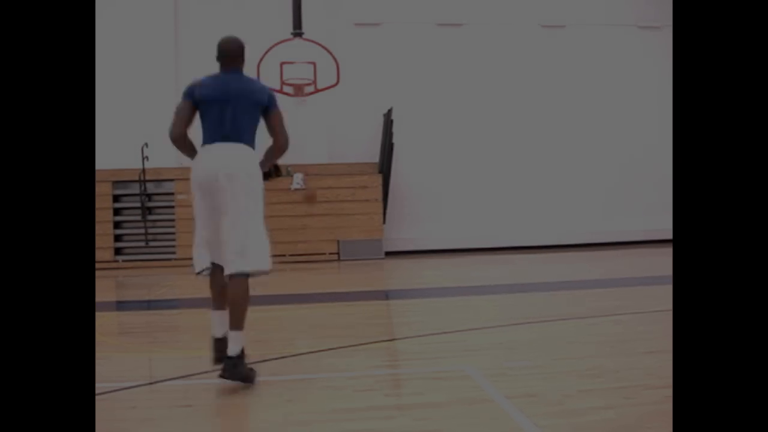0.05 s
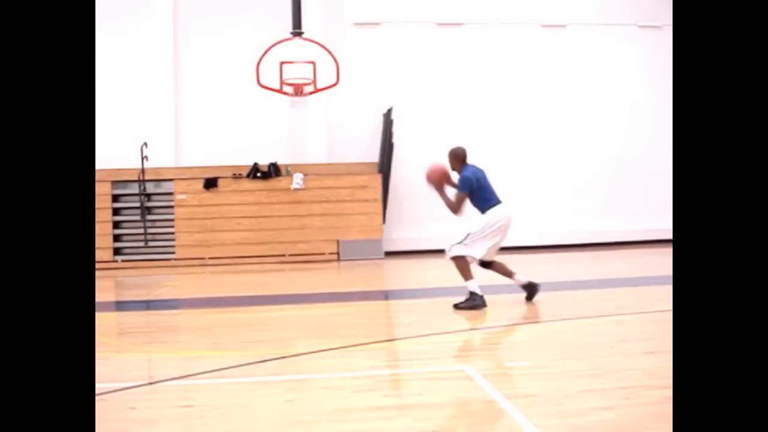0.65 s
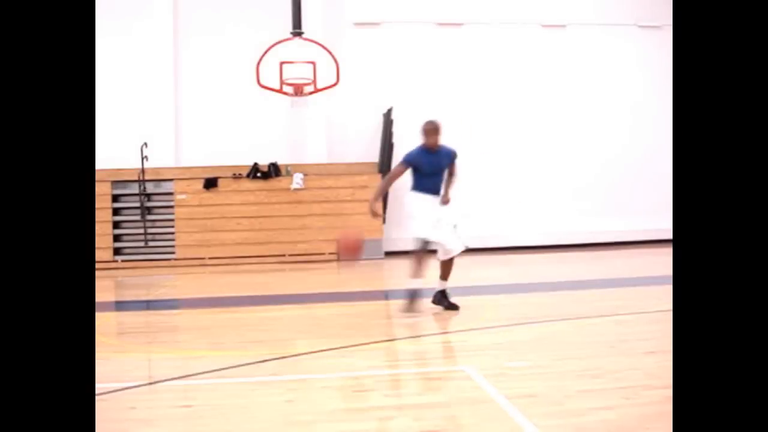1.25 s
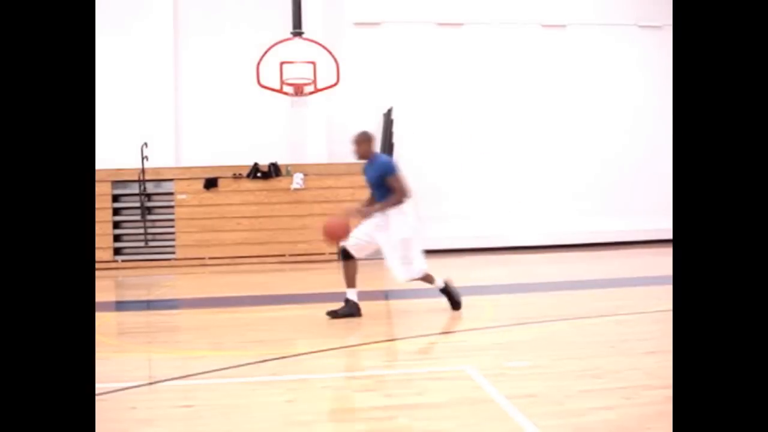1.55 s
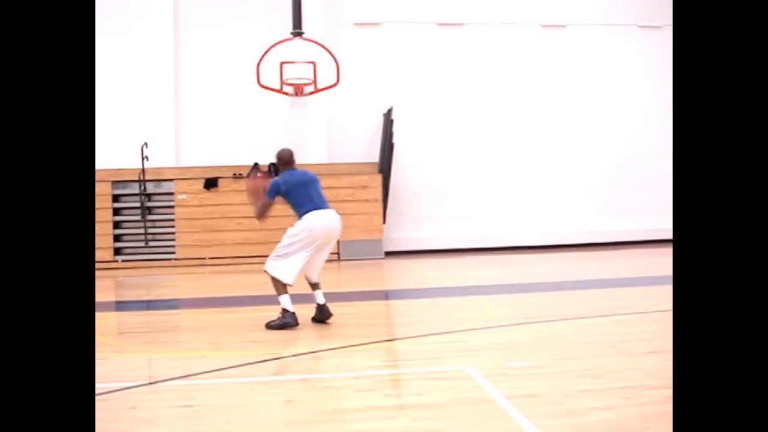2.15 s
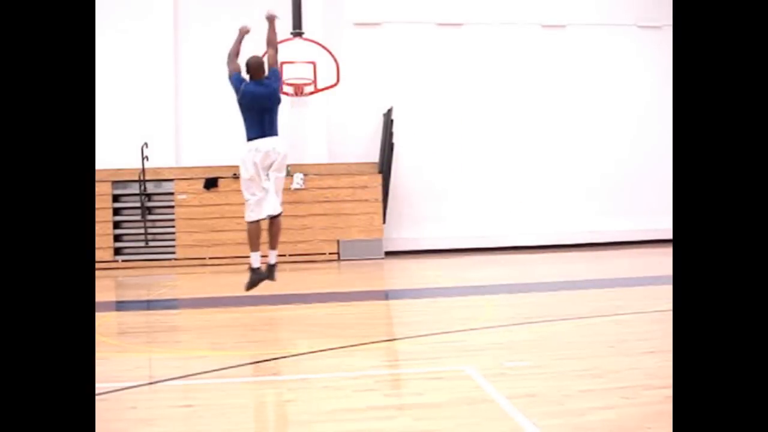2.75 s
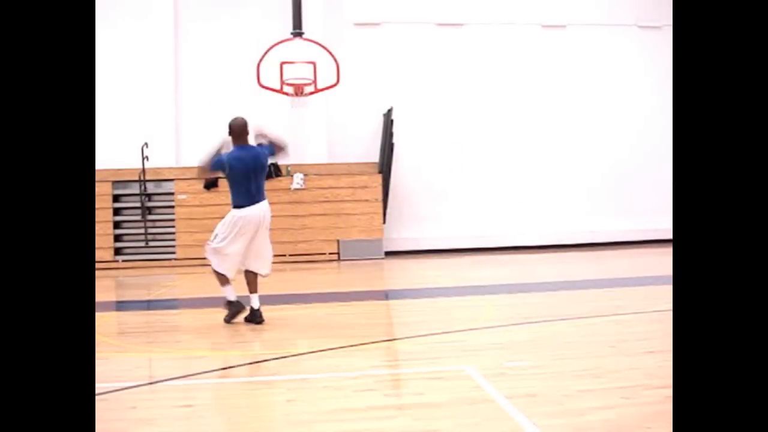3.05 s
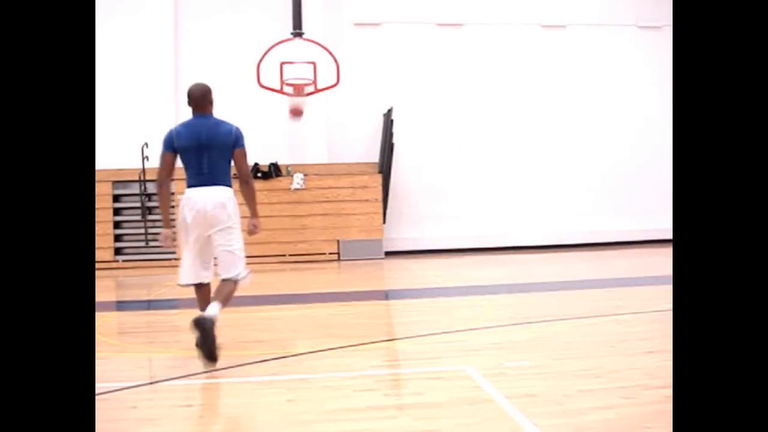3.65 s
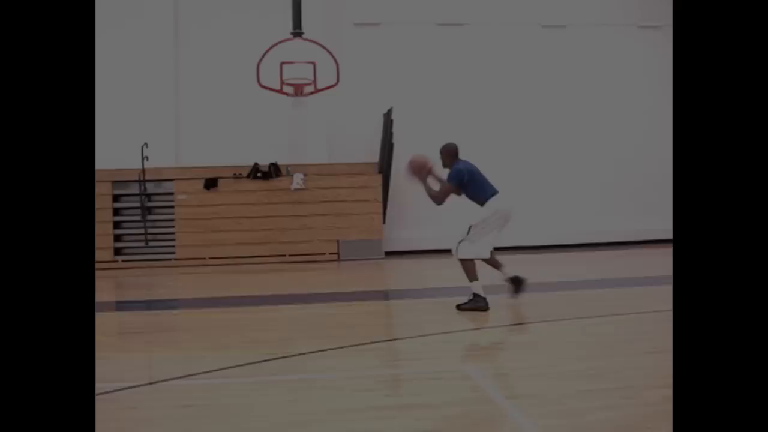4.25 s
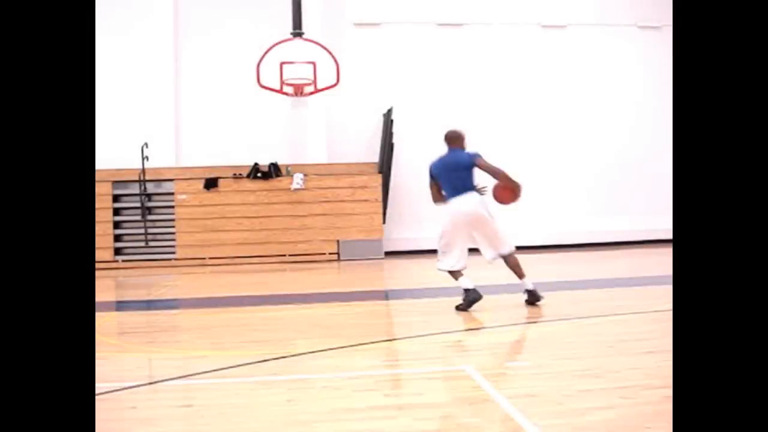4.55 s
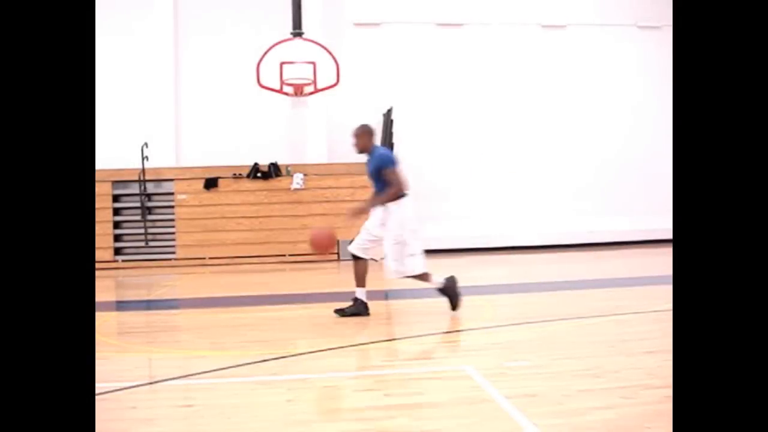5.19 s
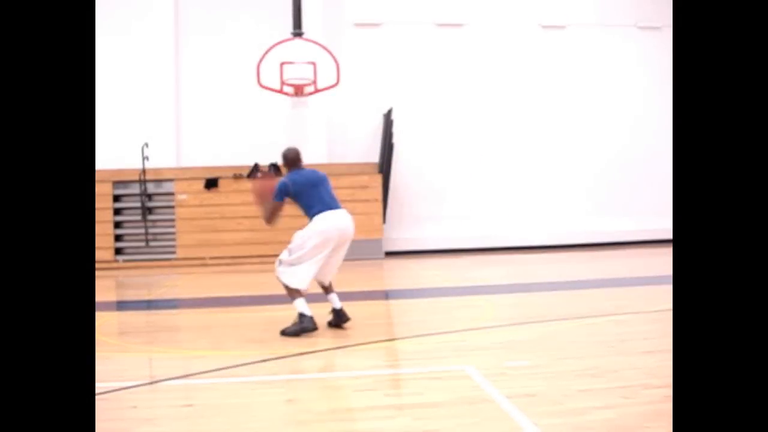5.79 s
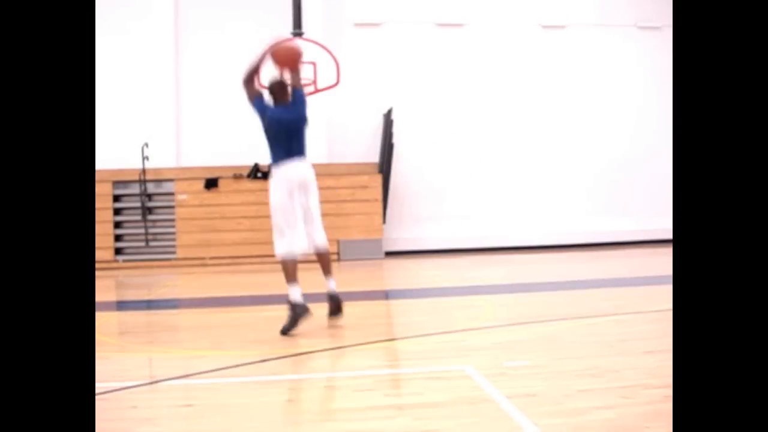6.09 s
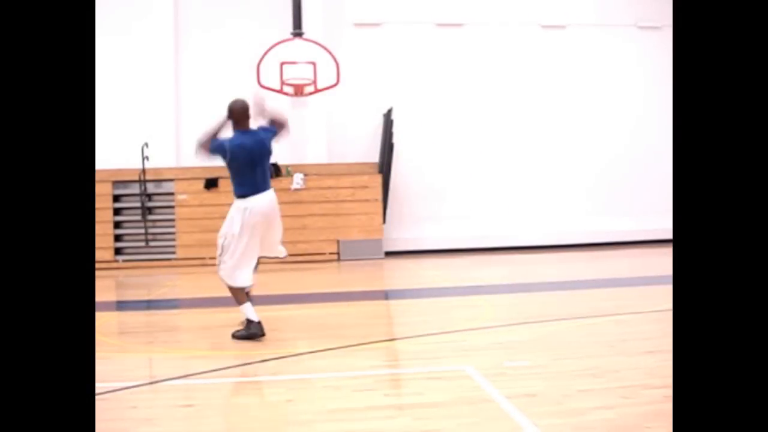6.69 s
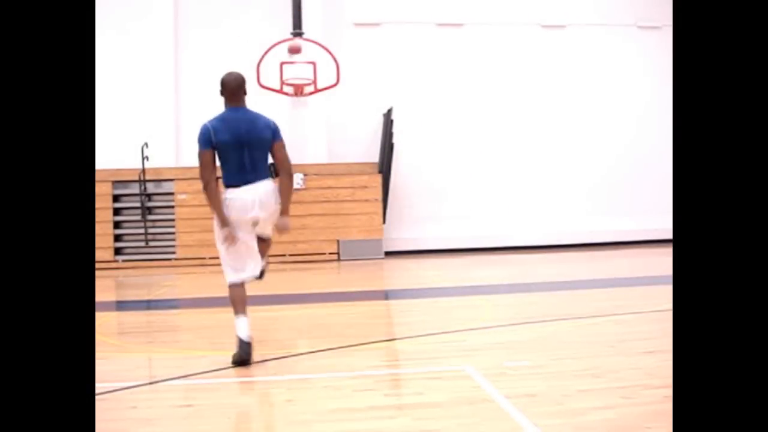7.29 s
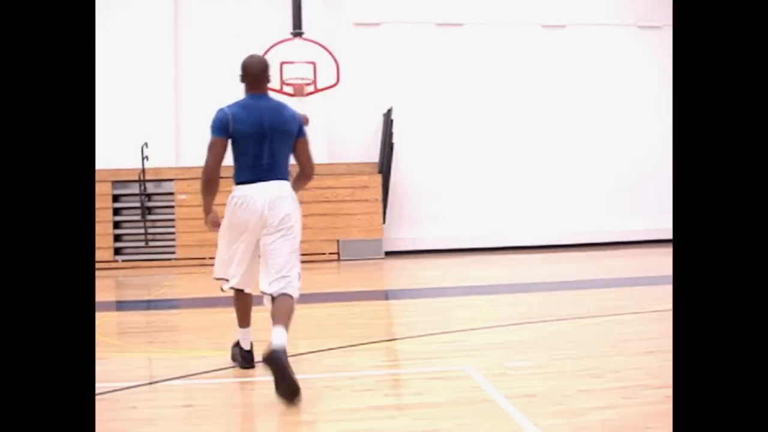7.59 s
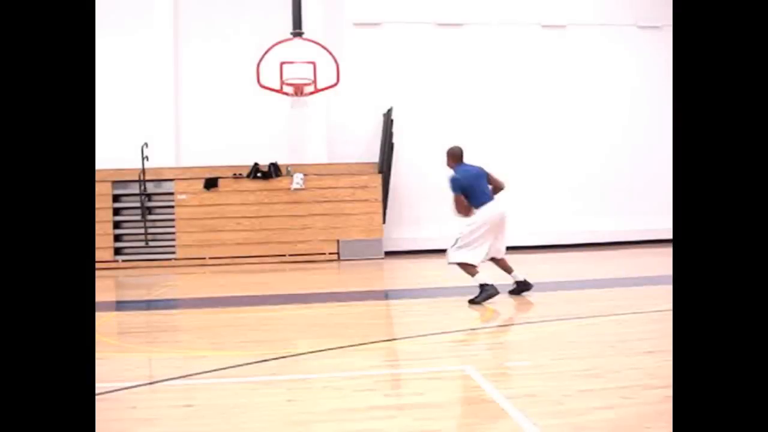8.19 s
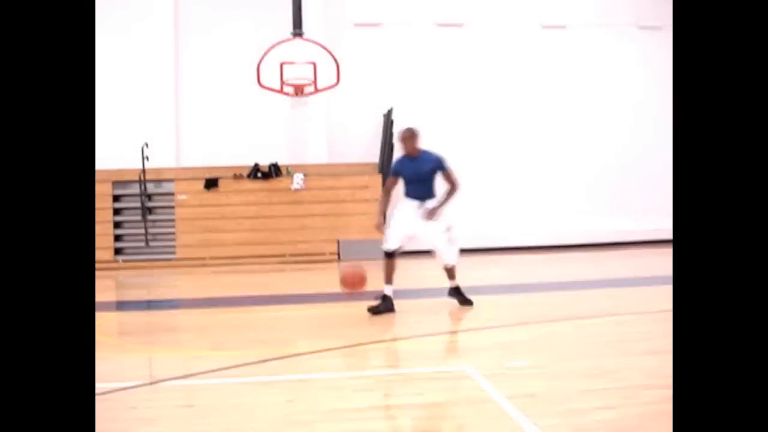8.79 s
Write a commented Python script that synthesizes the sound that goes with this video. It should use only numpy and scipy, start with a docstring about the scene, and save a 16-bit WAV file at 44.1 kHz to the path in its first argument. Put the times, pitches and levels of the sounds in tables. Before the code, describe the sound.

Ventilation roars steadily in a large, echoing gym, heard in mono. A sneaker screeches at the very start, then everything fades briefly to silence at 0.3 seconds and returns. Short, high squeaks at 1.2 seconds lead to one hard basketball bounce on the wooden floor at 1.5. A shoe screeches to a stop at 2.1, and feet land with a sharp slap at 3.1. Lighter steps follow, with a net swish at 3.7 and a squeak at 3.9. The sound fades out and back in around 4.2. Squeaks come near 4.8, a bounce at 5.1, and more squeaks and a hard stop between 5.5 and 5.7. Feet land at 6.7, followed by a soft step and a faint swish at 7.5. After another fade near 7.9, a shoe squeaks at 8.6 and the loudest bounce hits at 8.8. Bounces and squeaks leave long reverberant tails.

```python
"""A sneaker screeches to a stop over the steady roar of ventilation: basketball drills in a large gym.
Rubber soles stick and slip on the wooden floor, feet slap the boards, the ball swishes through the net
and, loudest of all, smacks down in hard dribbles. Walls and ceiling throw back echoes and a long tail.
The gain ducks after shrill sounds. The mix is mono and fades out and back in before each of three drills."""
import sys
import numpy as np
from scipy import signal
from scipy.fft import rfft, irfft, next_fast_len
from scipy.io import wavfile
from scipy.ndimage import map_coordinates

SR = 44100
rng = np.random.default_rng(int(sys.argv[2]) if len(sys.argv) > 2 else 0)


def persist_wave(psi):
    """Save psi, clipped to +-1, as 16-bit WAV."""
    counts = np.round(np.clip(psi, -1, 1) * 32767).astype(np.int16)
    wavfile.write(sys.argv[1], SR, np.atleast_2d(counts).T)


N = 394254

# colour of the air in the ducts: (frequency [Hz], relative level [dB])
VENT_COLOUR = [(15, -54.5), (25, -37), (47, -10), (80, -8), (160, -1), (290, -1.5), (460, -1), (550, -1.5),
               (1000, -2.5), (1500, -8.5), (1800, -8.5), (2500, -10.5), (3550, -15.5), (6000, -25.5),
               (8100, -34), (10200, -45)]
# how long the hall rings: (frequency [Hz], t60 [s])
HALL_DECAY = [(100, 4.1), (500, 2.4), (2000, 5.5), (5000, 2.8), (7000, 1.74), (10000, 1.22)]
# the ball brushing through the net: (time [s], rise [s], t60 [s], cord hiss [dB], whoosh [dB])
NET_SWISHES = [(3.73, 0.082, 1.15, -30, -25.5), (7.546, 0.01, 0.73, -42, -45)]
# hiss of the cords: (frequency [Hz], relative level [dB])
CORD_COLOUR = [(1000, 0), (2500, 6), (4500, 0.5), (7500, -3.5), (8800, 0.5), (10000, -18.5)]
# hollow body of the swish: (frequency [Hz], relative level [dB])
WHOOSH_COLOUR = [(60, 0), (150, 4.5), (280, -2), (400, 11.5), (600, -7), (1000, -1), (2000, -12),
                 (5000, -29)]
# feet landing: (time [s], sole slap [dB], floor thud [dB])
FOOTFALLS = [(2.068, -40, -35), (3.061, -8.5, -28), (3.322, -27, -32), (3.858, -24, -29),
             (5.662, -34, -32.5), (6.681, -17, -47), (7.333, -34, -37)]
# rubber scraping: (frequency [Hz], relative level [dB])
RASP_COLOUR = [(2500, -11), (4500, -3.5), (6000, 2), (8000, -10.5), (10000, -13)]
# far walls answering a squeak: (delay [s], relative level [dB])
FAR_ECHOES = [(0.084, -6), (0.105, -7.5), (0.122, -9), (0.161, -11)]
# a sole slipping in one glide:
# (time [s], length [s], start pitch [Hz], end pitch [Hz], level [dB], roughness [0-1], room send [dB])
SOLE_SLIPS = [ (.27, 0.037, 4650, 4900, -42.5, .6, 0.5), (1.232, 0.027, 5610, 5410, -26.5, 0.32, -7.5),
              (1.298, .038, 4597, 4730, -35.5, 0.29, 2), (2.034, .014, 4830, 5000, -34.5, 0.5, 4),
              (3.869, .007, 5900, 5400, -18, .4, -1), (4.242, 0.03, 4660, 4860, -42, 0.4, -0.5),
              (4.705, 0.0037, 5600, 5700, -27.5, 0.4, -7), (4.825, .021, 5850, 5760, -21.5, 0.2, -7),
              (5.465, .012, 4500, 4630, -28.5, .25, -4), (5.485, .021, 4760, 5550, -28, 0.42, -2.5),
              (5.665, 0.012, 5180, 4510, -30.5, 0.6, 0), (8.569, 0.038, 6780, 5920, -24, 0.24, -1)]
# a foot planted hard: (time [s], length [s], bite pitch [Hz], bite level [dB], low whistle [Hz],
# low level [dB], high whistle [Hz], high level [dB], room send [dB])
HARD_STOPS = [(.002, 0.0413, 6300, -26, 5420, -19, 6030, -22.5, -3.5),
              (2.075, 0.0194, 6600, -23, 5065, -24.5, 6750, -29.5, 5.5),
              (5.675, 0.013, 6400, -22.5, 5950, -25, 7686, -31, 4.3)]
# hard dribbles: (time [s], level [dB], late boom relative to the bounce [dB])
BALL_BOUNCES = [(1.489, -8.7, -24), (5.147, -9, -20.5), (8.847, -6, -23)]
# the air ringing inside the ball: (frequency [Hz], relative level [dB], t60 [s])
BALL_MODES = [(664, -30.5, 0.075), (1024, -31.5, 0.017), (1510, -17.5, .025), (2320, -22, 0.026),
              (2690, -33, 0.016)]
# walls and ceiling answering the ball: (delay [s], relative level [dB])
BALL_ECHOES = [(0.0127, -8), (.033, -1), (.039, 4), (.043, 0), (.047, 1), (.055, 5.5), (.063, -1.5),
               (.078, -7.5), (.086, -1.5)]
# colour of the ball's scattered echoes and of a sole's scuff: (frequency [Hz], relative level [dB])
SCATTER_COLOUR = [(40, -19), (180, 10), (330, -8.5), (700, 4.5), (1200, 2), (2300, -2), (4000, -10.5),
                  (7000, -16.5), (10000, -28.5)]
# the fade before each drill: (silent moment [s], fade-out [s], fade-in [s])
DRILL_FADES = [(.267, 0.51, 0.26), (4.24, 0.22, 0.3), (7.94, 0.26, 0.31)]


def amp(db):
    """Decibels to gain."""
    return 10 ** (np.asarray(db) / 20)


def unit(x):
    """Scale to rms 1."""
    return x / np.sqrt(np.mean(x ** 2) + 1e-20)


def along(points, hz):
    """Read a curve of (frequency, value) points on a log axis."""
    freqs, values = np.transpose(points)
    return np.interp(np.log(hz + 1), np.log(freqs + 1), values)


def clock(seconds):
    """Sample times from zero."""
    return np.arange(int(seconds * SR)) / SR


def add(track, s, sound):
    """Mix a sound in at time s, cut off where the next fade reaches silence."""
    start = round(s * SR)
    end = min([round(cut * SR) for cut, _, _ in DRILL_FADES if cut > s] + [N])
    sound = sound[:end - start]
    track[start:start + len(sound)] += sound


def noise(colour, size):
    """Coloured noise of rms 1."""
    hz = np.fft.rfftfreq(size, 1 / SR)
    return unit(irfft(rfft(rng.standard_normal(size)) * amp(along(colour, hz)), size))


def wobble(rate, size):
    """A smooth random curve, rate knots a second."""
    knots = rng.standard_normal(int(size * rate / SR) + 4)
    return map_coordinates(knots, [np.arange(size) * rate / SR])


def blurred(phase, rate):
    """A tone smeared into a narrow band of noise."""
    return wobble(rate, len(phase)) * np.sin(phase) + wobble(rate, len(phase)) * np.cos(phase)


def ventilation(level_db=-28.4, fan_hz=367, fan_db=-15, drift_db=0.49):
    """The bed: air roars steadily in the ducts, with a blurred fan tone on top."""
    fan = unit(blurred(2 * np.pi * fan_hz * np.arange(N) / SR, rate=22))
    air = noise(VENT_COLOUR, next_fast_len(N))[:N] * amp(drift_db * wobble(7, N))
    return amp(level_db) * (air + amp(fan_db) * fan)


def hall(x, delay, build):
    """The gym's diffuse tail builds up after a pre-delay; the top end dies first."""
    hz, t, spectrum = signal.stft(rng.standard_normal(2 * SR), SR, nperseg=256)
    decay = amp(-60 * t / along(HALL_DECAY, hz)[:, None])
    tail = signal.istft(spectrum * decay, SR, nperseg=256)[1]
    tail *= np.clip((np.arange(len(tail)) / SR - delay) / build, 0, 1)
    return signal.fftconvolve(x, tail / np.linalg.norm(tail))


def wall_echo(x, t60, count=5):
    """A wall returns the sound along a few paths of nearly equal length."""
    paths = np.zeros(SR // 50)
    paths[rng.integers(0, len(paths), count)] = rng.choice([-.5, .5], count)
    paths[0] = 1
    paths *= amp(-60 * np.arange(len(paths)) / SR / t60)
    return signal.fftconvolve(x, paths / np.linalg.norm(paths))


def in_gym(chirp, room_db, near_wall_s=.041, near_wall_db=-1, tail_db=1.5):
    """A dry squeak followed by the near wall, the far walls and the hall's tail."""
    out = amp(room_db + tail_db) * hall(chirp, delay=0.055, build=0.027)
    out[:len(chirp)] += chirp
    for delay, level in [(near_wall_s, near_wall_db), *FAR_ECHOES]:
        echo = amp(room_db + level) * wall_echo(chirp, t60=.017)
        out[round(delay * SR):][:len(echo)] += echo
    return out


def net(flutter_db=4.5):
    """Cords rub over the ball: a ragged hiss above a hollow, lingering whoosh."""
    out, t = np.zeros(N), clock(1)
    for s, rise, t60, hiss_db, whoosh_db in NET_SWISHES:
        swell = np.minimum(t / rise, 1) * amp(-60 * np.maximum(t - rise, 0) / t60)
        hiss = amp(hiss_db + flutter_db * wobble(120, len(t))) * noise(CORD_COLOUR, len(t))
        whoosh = amp(whoosh_db) * noise(WHOOSH_COLOUR, len(t))
        add(out, s, swell * (hiss + whoosh))
    return out


def crack(width_s, cutoff_hz):
    """The transient: a pressure pulse from two surfaces meeting, rounded by the rubber."""
    u = clock(.5) / width_s
    return signal.lfilter(*signal.butter(2, cutoff_hz, fs=SR), (1 - u) * np.exp(-u))


def ring(hz, t60):
    """One struck resonance of the floor or the ball, dying away."""
    t = clock(.5)
    return np.sin(2 * np.pi * hz * t) * amp(-60 * t / t60)


def steps(scuff_t60=0.024, bleachers_s=0.087, bleachers_db=-4, tail_db=-3):
    """A sole slaps and scuffs the boards, which knock and thud under the weight; the bleachers answer."""
    out, t = np.zeros(N), clock(.5)
    for s, slap_db, thud_db in FOOTFALLS:
        scuff = amp(-11 - 60 * t / scuff_t60) * noise(SCATTER_COLOUR, len(t))
        knock = amp(-12) * ring(hz=2300, t60=0.024)
        slap = crack(width_s=0.00022, cutoff_hz=4500) + scuff + knock
        step = amp(slap_db) * slap + amp(thud_db) * ring(hz=83.4, t60=0.12)
        add(out, s, step)
        add(out, s + bleachers_s, amp(bleachers_db) * wall_echo(step, t60=.03))
        add(out, s, amp(tail_db) * hall(step, delay=0.017, build=0.014))
    return out


def whistle(length, start_hz, end_hz, rough, attack_share=0.16, release_s=0.0016, droop_db=3):
    """The tread sticks and slips thousands of times a second: a brief gliding whistle."""
    t = clock(length)
    glide_hz = start_hz + (end_hz - start_hz) * t / length
    jitter = 1 + 0.03 * rough * wobble(350, len(t))
    phase = 2 * np.pi * np.cumsum(glide_hz * jitter) / SR
    # ribs of the tread slipping out of step roughen the whistle and add a scrape
    chatter = 0.91 * rough * blurred(phase, rate=750)
    scrape = rough * amp(-13) * noise(RASP_COLOUR, len(t))
    octave = amp(-17) * np.sin(2 * phase)
    tone = unit((1 - rough / 2) * np.sin(phase) + chatter + octave)
    gate = np.clip(np.minimum(t / (attack_share * length), (length - t) / release_s), 0, 1)
    droop = unit(amp(-droop_db * t / length))
    return gate * droop * (tone + scrape)


def squeaks():
    """A pushing or pivoting foot gives one whistle that lights up the hall."""
    out = np.zeros(N)
    for s, length, start_hz, end_hz, db, rough, room_db in SOLE_SLIPS:
        add(out, s, amp(db) * in_gym(whistle(length, start_hz, end_hz, rough), room_db))
    return out


def stops(bite_s=0.0076, bite_fall=1.08, bite_room_db=-5.5, sag=.028):
    """The sole bites with a falling chirp, then two parts of its tread screech and sag as it slows."""
    out = np.zeros(N)
    for s, length, bite_hz, bite_db, low_hz, low_db, high_hz, high_db, room_db in HARD_STOPS:
        bite = whistle(bite_s, bite_fall * bite_hz, bite_hz, rough=0.5)
        screech = sum(amp(db) * whistle(length, hz * (1 + sag), hz * (1 - sag), rough=.75)
                      for hz, db in [(low_hz, low_db), (high_hz, high_db)])
        add(out, s, amp(bite_db) * in_gym(bite, room_db + bite_room_db))
        add(out, s + bite_s, in_gym(screech, room_db))
    return out


def dribbles(scatter_t60=0.019, mirror_db=-15, tail_db=-1, boom_hz=94, boom_s=0.286, boom_width_s=0.091):
    """The ball smacks the sprung floor and pings; echoes off beams and bleachers outweigh the dry hit."""
    out, t = np.zeros(N), clock(.5)
    ping = sum(amp(level) * ring(hz, t60) for hz, level, t60 in BALL_MODES)
    smack = amp(2) * crack(width_s=0.00018, cutoff_hz=4200) + ping
    floor = amp(-18) * ring(hz=89.6, t60=0.22) + amp(-14.5) * ring(hz=18, t60=0.11)
    # a low boom rolls back late from the far end of the hall
    boom = np.sin(2 * np.pi * boom_hz * t) * np.exp(-((t - boom_s) / boom_width_s) ** 2)
    for s, db, boom_db in BALL_BOUNCES:
        bounce = smack.copy()
        for delay, level in BALL_ECHOES:
            scatter = amp(-6 - 60 * t / scatter_t60) * noise(SCATTER_COLOUR, len(t))
            echo = amp(level) * (scatter + amp(mirror_db) * smack)
            bounce += np.pad(echo, (round(delay * SR), 0))[:len(t)]
        add(out, s, amp(db) * (bounce + floor + amp(boom_db) * boom))
        # the mids linger most in the hall
        mids = signal.lfilter(*signal.butter(1, [750, 2700], "bandpass", fs=SR), bounce)
        add(out, s, amp(db + tail_db) * hall(mids, delay=0.0083, build=0.016))
    return out


def ducking(x, sidechain_hz=7430, smooth_s=.03, threshold_db=-44.5, share=.27, recover_db_per_s=1.6):
    """Treble above a threshold pushes the gain down at once; it creeps back at a steady rate."""
    treble = signal.sosfilt(signal.cheby1(6, 1, sidechain_hz, "highpass", fs=SR, output="sos"), x)
    pole = np.exp(-1 / (smooth_s * SR))
    treble_db = 10 * np.log10(signal.lfilter([1 - pole], [1, -pole], treble ** 2) + 1e-12)
    push_db = share * np.maximum(treble_db - threshold_db, 0)
    recovery_db = recover_db_per_s * np.arange(N) / SR
    duck_db = np.maximum.accumulate(push_db + recovery_db) - recovery_db
    return amp(-duck_db)


def scene():
    """Shoes, ball and net over the ventilation, alike on both sides."""
    mono = squeaks() + stops() + dribbles() + steps() + net() + ventilation()
    return np.array([mono, mono])


def record(dry):
    """The master chain: ducking, straight fades between the drills, then a brick-wall high cut."""
    t = np.arange(N) / SR
    mix = dry * ducking(dry[0])
    for s, fall, rise in DRILL_FADES:
        mix *= np.interp(t, [s - fall, s, s + rise], [1, 0, 1])
    size = next_fast_len(N + SR)
    passband = np.fft.rfftfreq(size, 1 / SR) < 10080  # Hz
    return irfft(rfft(mix, size) * passband, size)[:, :N]


dry = scene()
out = record(dry)
persist_wave(out)
```